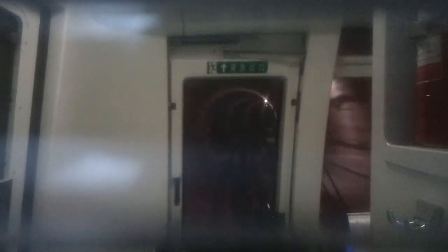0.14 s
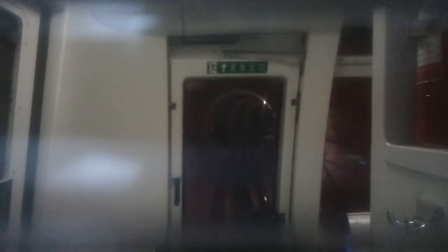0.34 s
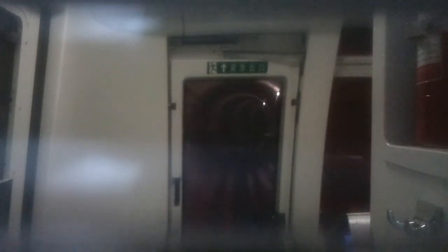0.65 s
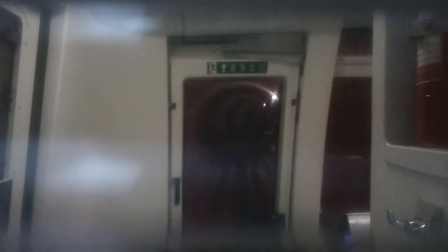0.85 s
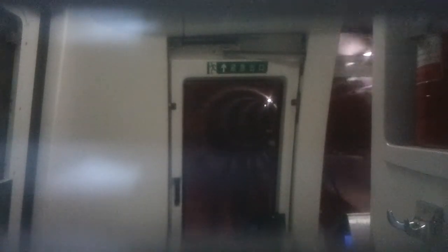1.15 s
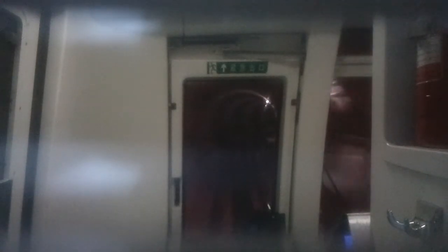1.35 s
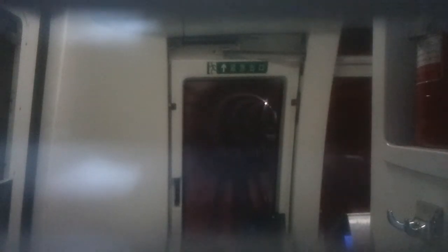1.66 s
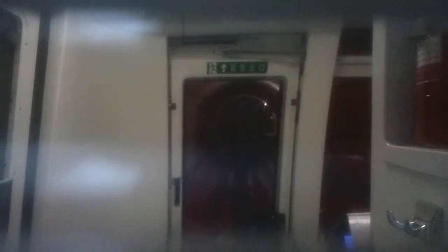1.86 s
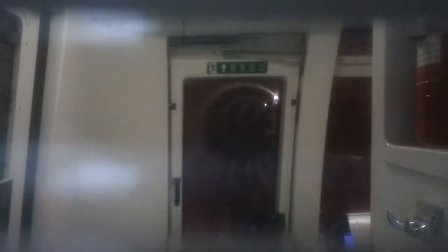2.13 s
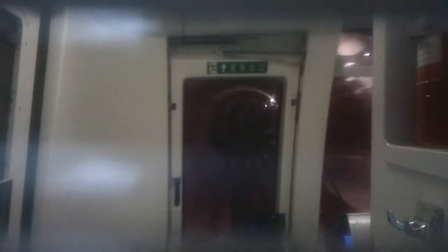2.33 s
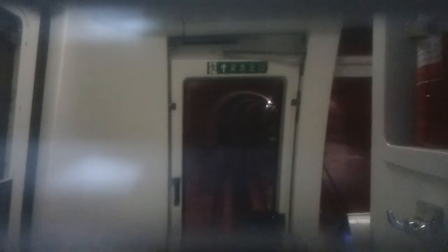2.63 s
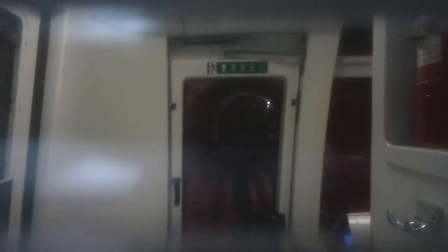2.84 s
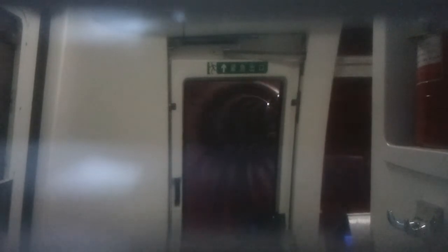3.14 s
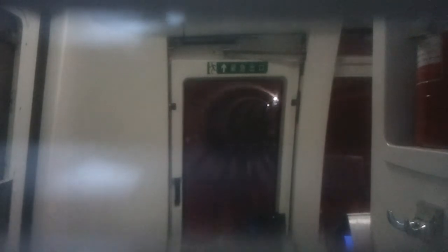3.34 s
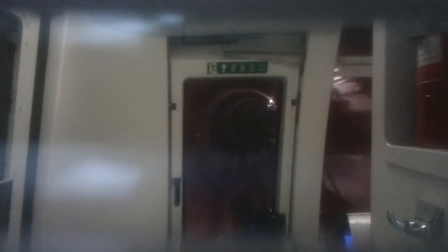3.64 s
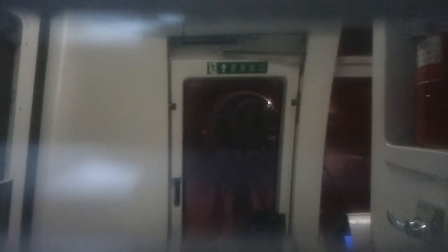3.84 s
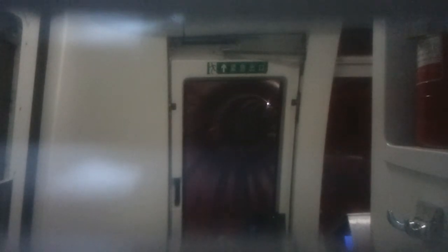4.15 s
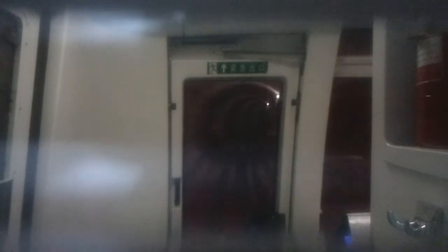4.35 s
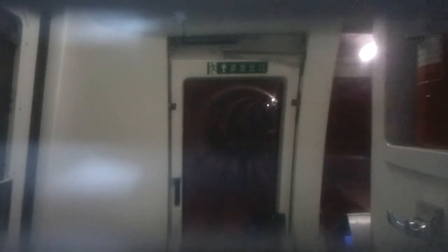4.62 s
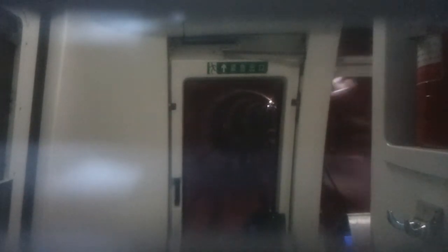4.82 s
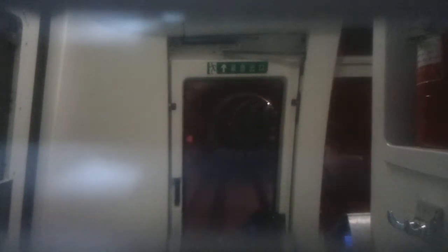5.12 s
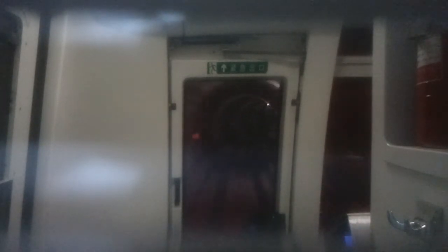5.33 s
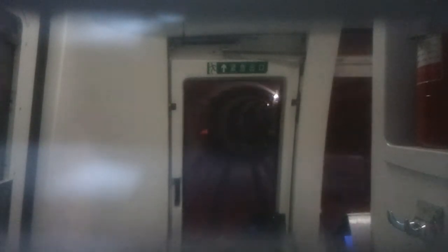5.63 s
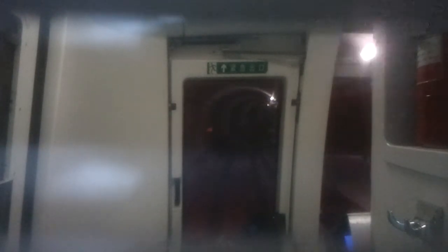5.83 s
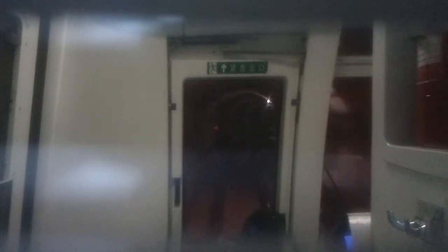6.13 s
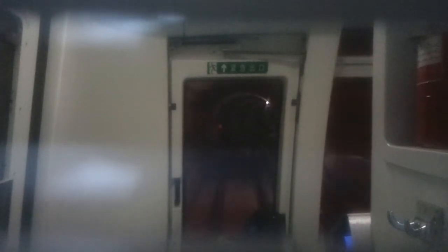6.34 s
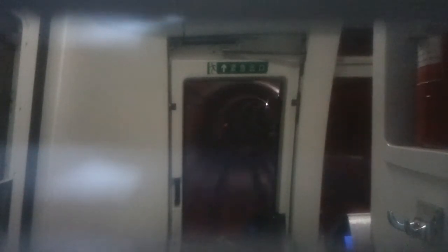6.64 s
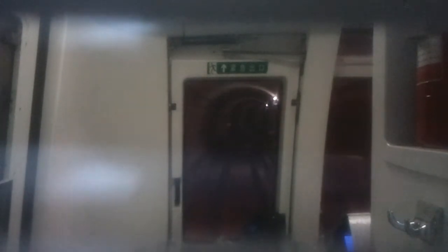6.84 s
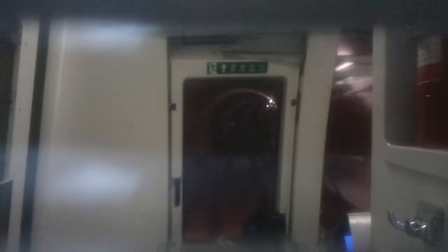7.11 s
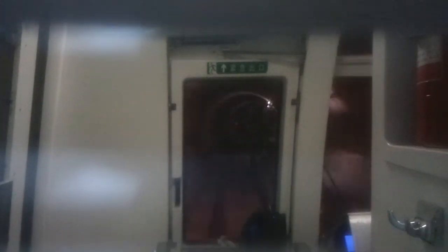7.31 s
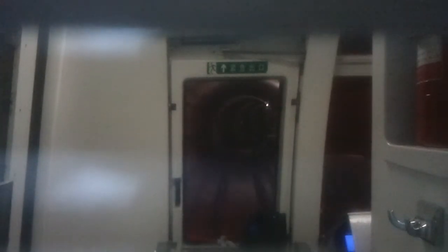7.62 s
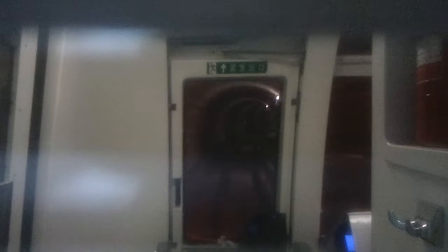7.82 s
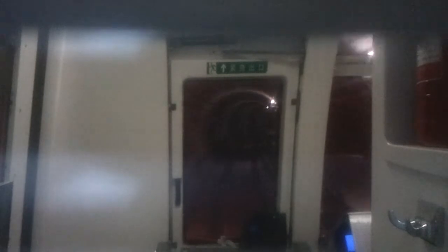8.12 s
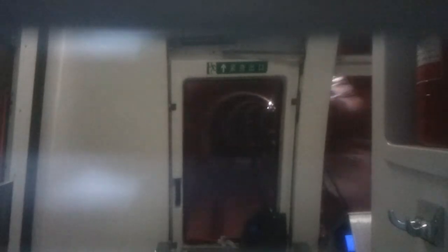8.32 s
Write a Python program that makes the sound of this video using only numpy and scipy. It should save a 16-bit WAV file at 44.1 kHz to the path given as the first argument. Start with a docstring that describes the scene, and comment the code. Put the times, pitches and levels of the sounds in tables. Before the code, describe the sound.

Loud, distorted low rumble of an underground train heard from within, throbbing unevenly over a dull rolling roar, peppered with sharp digital-sounding crackles.

```python
"""Inside a subway car running through a tunnel: the car's air booms near 65 Hz as a wavering sine,
its body and floor drone as shaped noise and panel modes, and the wheels roar, howl and hiss on the
rails as fluttering bands of noise. A small recorder is overloaded by the boom: it ducks the roar in
surges, squashes it on every bass crest and crackles in bursts at the seams of its 8 ms blocks."""
import sys
import numpy as np
from scipy import signal
from scipy.fft import rfft, irfft, next_fast_len
from scipy.io import wavfile
from scipy.ndimage import uniform_filter1d, minimum_filter1d, map_coordinates

SR = 44100
rng = np.random.default_rng(int(sys.argv[2]) if len(sys.argv) > 2 else 0)


def generate_wav(sig):
    """Save sig (samples, or channels by samples) to the path in sys.argv[1] as 16-bit PCM at SR."""
    pcm = np.round(np.clip(np.atleast_2d(sig).T, -1, 1) * 32767).astype(np.int16)
    wavfile.write(sys.argv[1], SR, pcm)


N = 373527  # length in samples


def amp(db):
    """Decibel law: every 20 dB is a factor of ten in amplitude."""
    return 10 ** (np.asarray(db) / 20)


def unit(x):
    """Normalisation: the signal scaled to rms 1."""
    return x / np.sqrt(np.mean(x ** 2) + 1e-20)


def curves(rows):
    """Linear interpolation: one value per sample for each column after the time."""
    seconds, *columns = np.transpose(rows)
    t = np.arange(N) / SR
    return [np.interp(t, seconds, column) for column in columns]


def wobble(rate):
    """Band-limited randomness: a smooth curve through `rate` random knots a second."""
    knots = rng.standard_normal(int(N * rate / SR) + 4)
    return map_coordinates(knots, [np.arange(N) * rate / SR])


def swells(rows):
    """Superposition of flat-topped bumps in dB, each at half its height one half length from its centre."""
    t = np.arange(N) / SR
    return sum(db / (1 + ((t - centre) / half) ** 4) for centre, half, db in rows)


def spells(rows):
    """Gating: a sudden step in dB that lasts from start to end of each row."""
    t = np.arange(N) / SR
    return sum(db * ((t >= start) & (t < end)) for start, end, db in rows)


def filtered(x, response):
    """Linear filtering: the spectrum of x times a response of frequency."""
    size = next_fast_len(N + SR // 2)
    hz = np.fft.rfftfreq(size, 1 / SR)
    return irfft(rfft(x, size) * response(hz), size)[:N]


def coloured(x, spectrum):
    """Spectral shaping: x through (Hz, dB) points on a log frequency axis, at rms 1."""
    points_hz, points_db = np.transpose(spectrum)

    def response(hz):
        return amp(np.interp(np.log(hz + 1), np.log(points_hz + 1), points_db))
    return unit(filtered(x, response))


def narrow_noise(centre_hz, width_hz):
    """Quadrature modulation: two random curves make a narrow band, rms 1, around a steady or moving centre."""
    phase = 2 * np.pi * np.cumsum(centre_hz * np.ones(N)) / SR
    return unit(wobble(width_hz) * np.cos(phase) + wobble(width_hz) * np.sin(phase))


def patchy_noise(patchy_db):
    """Non-stationary noise: narrow bands of white noise swell and fade on their own."""
    bands = signal.stft(rng.standard_normal(N), nperseg=2048)[2]
    field = uniform_filter1d(rng.standard_normal(bands.shape), size=5, axis=0)  # across frequency
    field = uniform_filter1d(field, size=6, axis=1)  # across time
    return signal.istft(bands * amp(patchy_db * unit(field)), nperseg=2048)[1][:N]


# The slow course of the ride. Each row: time in seconds, then relative levels in dB of the boom,
# the body shake, the wheel howl, the roar and the rail hiss.
RIDE_COURSE = [(0, -10, -28.5, -29.5, -35.5, -45.5), (.5, -12.5, -31, -27.5, -35.5, -45),
               (1.1, -11, -26, -29.5, -35.5, -46.5), (1.45, -4, -31, -28, -34, -43.5),
               (2, -12.5, -22.5, -29.5, -36, -44), (2.25, -6, -26, -29, -34.5, -44.5),
               (2.7, -6.5, -24, -27.5, -35, -45), (3.4, -7, -24, -28, -35, -45),
               (3.75, -8.5, -25, -28, -36, -43), (4.2, -5, -23, -29, -34.5, -44.5),
               (4.6, -4.5, -23.5, -27.5, -37, -44), (5.1, -4.5, -22, -27, -35, -46.5),
               (6, -6.5, -21.5, -28.5, -36, -45), (6.7, -4.5, -21, -28, -35.5, -45),
               (7.4, -5.5, -21.5, -29, -35, -45), (8.1, -6.5, -22.5, -27.5, -35.5, -45),
               (8.47, -6.5, -21.5, -27.5, -35.5, -48)]
# On smooth track the boom builds up into a strong, pure ring.
# Each row: centre in seconds, half length in seconds, rise in dB.
BOOM_SURGES = [(1.36, 0.058, 0.5), (2.14, 0.04, 5.5), (2.54, 0.032, 1.5), (3.24, 0.037, 0),
               (3.38, 0.035, 2.5), (4.02, 0.036, 1), (4.12, 0.021, 0.5), (4.45, 0.029, 1), (4.84, 0.036, 3),
               (5.005, 0.06, 1), (5.21, 0.037, 2.5), (5.48, .03, 0), (6.26, 0.027, 5), (6.63, 0.051, 2.5),
               (6.83, 0.015, 3.5), (7.27, 0.074, 3), (7.68, 0.042, 2), (8.05, 0.052, 2.5)]
# The boom weakens for a moment. Each row: centre in seconds, half length in seconds, drop in dB.
BOOM_LULLS = [(.15, 0.06, 18.5), (.63, 0.023, 9.5), (.87, .03, 6), (1.1, .025, 7.5), (1.26, 0.02, 12),
              (1.43, 0.021, 9.5), (1.62, .03, 6), (1.78, .03, 2), (2.05, 0.027, 4), (2.23, 0.018, 16),
              (3.03, 0.037, 6.5), (3.305, 0.013, 12), (3.455, 0.018, 8), (3.66, 0.018, 3.5),
              (4.17, 0.038, 3.5), (4.41, 0.016, 8), (4.55, 0.049, 6.5), (4.72, 0.05, 10), (4.92, 0.03, 4.5),
              (5.12, 0.023, 1.5), (5.33, 0.015, 13), (5.42, 0.018, 9), (5.79, 0.038, 17.5),
              (5.98, 0.061, 5), (6.16, 0.022, 6), (6.48, 0.053, 11), (7.02, 0.032, 2.5), (7.15, 0.027, 8),
              (7.42, 0.021, 5), (7.61, 0.023, 14), (7.97, 0.049, 7.5), (8.23, 0.047, 9)]
# Course of the ringing air's pitch. Each row: time in seconds, pitch in Hz.
AIR_PITCH = [(0, 72.1), (.17, 62.27), (.5, 72.15), (.72, 64), (.85, 75.1), (1.2, 66.77), (1.48, 66),
             (1.57, 72.87), (1.85, 62), (2, 66), (2.25, 65.5), (2.34, 75), (2.45, 66), (2.75, 67),
             (2.92, 57), (3.13, 76), (3.25, 55), (3.5, 72.85), (3.63, 73), (3.8, 60.14), (3.92, 67.9),
             (4.2, 70.97), (4.47, 57.1), (4.57, 74.83), (4.8, 64.95), (5.08, 65.05), (5.2, 58.75),
             (5.33, 64.94), (5.58, 56.5), (5.8, 69.3), (6.25, 61.82), (6.49, 78.9), (6.6, 62.75), (6.9, 62),
             (7.15, 64.83), (7.3, 62.46), (7.7, 61), (7.87, 72.87), (8.08, 66.53), (8.25, 73.23),
             (8.47, 66)]
WANDER_HZ = 1.568  # scale of the quick random wander about that pitch


def boom(gain_db=-1.7, lumps_db=1.5, stagger=0.52, jolts_hz=42, sway_db=0.27, sway_hz=9, wander_rate_hz=11):
    """Cavity resonance: rough track shakes the car, and its air rings at the lowest resonance."""
    level_db = curves(RIDE_COURSE)[0] + swells(BOOM_SURGES) - swells(BOOM_LULLS)
    strength_db = np.maximum(level_db - level_db.mean(), -6)
    # jolts upset the size and timing of the ring, a weak one more than a strong one
    upset = amp(0.72 * jolting() - 0.66 * strength_db)
    pitch_hz = curves(AIR_PITCH)[0] + WANDER_HZ * wobble(wander_rate_hz)
    steady_phase = 2 * np.pi * np.cumsum(pitch_hz) / SR
    phase = steady_phase + stagger * upset * wobble(jolts_hz)
    uneven_db = upset * (lumps_db * wobble(jolts_hz) + sway_db * wobble(sway_hz))
    ring = unit(amp(uneven_db) * np.sin(phase))
    return amp(level_db + gain_db) * ring


# Rough stretches of track. Each row: centre in seconds, half length in seconds, rise in dB.
ROUGH_TRACK = [(2.33, 0.018, 9), (2.72, 0.04, 1.5), (3.13, 0.048, 8), (3.57, 0.14, 3.5), (3.88, 0.086, 4),
               (4.33, 0.022, 3), (4.57, 0.06, 3), (4.73, 0.086, 10), (5.91, 0.035, 3.5), (6.06, 0.041, 3.5),
               (6.43, 0.12, 1), (7.17, 0.029, 10), (7.44, 0.059, 5.5), (7.87, 0.11, 3.5)]
SMOOTHING = 2.5  # dB less jolting for each dB of a boom surge


def jolting():
    """Forced vibration: how hard the track jolts the car, in dB about its usual state."""
    return swells(ROUGH_TRACK) - SMOOTHING * swells(BOOM_SURGES)


# The car body rumbling on its springs. Each row: frequency in Hz, relative level in dB.
BODY_SPECTRUM = [(5, -8), (20, -7.5), (38, -3), (52, 5), (65, -1), (78, 4.5), (91, 5), (105, -8.5),
                 (125, -15.5), (200, -56), (400, -120)]
# Floor panels over the bogie. Each row: frequency in Hz, relative level in dB.
FLOOR_SPECTRUM = [(60, -45.5), (120, -7), (155, 0.5), (182, -5), (208, -7), (240, -12), (300, -34),
                  (600, -85.5)]


def structure(rumble_db=9.5, drone_db=-32, drone_follows=0.78, lull_share=0.14, jolt_share=.55):
    """Structure-borne sound: the bogies shake the body and, less in step with the track, the floor panels."""
    shake_db = curves(RIDE_COURSE)[1] + jolt_share * jolting()
    body_db = shake_db + rumble_db - lull_share * swells(BOOM_LULLS)
    panels_db = drone_db + drone_follows * (shake_db - shake_db.mean())
    rumble = amp(body_db) * coloured(rng.standard_normal(N), BODY_SPECTRUM)
    drone = amp(panels_db) * coloured(rng.standard_normal(N), FLOOR_SPECTRUM)
    return rumble + drone


# The floor's ringing mode. Each row: time in seconds, relative level in dB.
FLOOR_MODE = [(0, -43.5), (1.3, -38.5), (1.95, -35.5), (2.15, -34), (2.5, -36), (2.9, -35), (3.13, -32.5),
              (3.4, -33), (3.8, -35.5), (4.25, -34), (5.2, -38.5), (6.3, -34), (6.9, -33), (7.4, -36),
              (8, -34), (8.47, -34)]
# A higher panel mode. Each row: time in seconds, relative level in dB.
WALL_MODE = [(0, -39), (.45, -40), (.68, -29), (.9, -42), (1.6, -38), (2.5, -39.5), (3.6, -36),
             (4.4, -42.5), (5.3, -41), (6.5, -39.5), (7.5, -36), (8, -34.5), (8.47, -37.5)]


def panel_modes(floor_hz=208, floor_width_hz=22, floor_db=1.0, wall_hz=343, wall_width_hz=22, wall_db=0.5):
    """Modal resonance: two panel modes swell and fade, each in its own time."""
    floor = amp(curves(FLOOR_MODE)[0] + floor_db) * narrow_noise(floor_hz, floor_width_hz)
    wall = amp(curves(WALL_MODE)[0] + wall_db) * narrow_noise(wall_hz, wall_width_hz)
    return floor + wall


# Wheels howling on the rails. Each row: frequency in Hz, relative level in dB.
HOWL_SPECTRUM = [(100, -41), (240, -8), (305, -0.5), (342, -4.5), (385, -2.5), (420, -2.5), (475, -0.3),
                 (535, -2), (600, -2), (645, -1), (715, -2.5), (810, -8), (950, -17), (1500, -66)]
# Wheels and panels ringing faintly in the howl.
# Each row: centre in Hz, width in Hz, level in dB against the howl's noise.
HOWL_RINGS = [(468.6, 22, -19), (602.4, 24, -16.5), (687, 28, -14)]
# The tunnel's roar through the windows. Each row: frequency in Hz, relative level in dB.
ROAR_SPECTRUM = [(500, -28), (900, 0), (1150, -2.5), (1520, -2), (1650, -5.5), (1780, -12.5), (4000, -40.5)]
# Rail hiss that leaks in round the doors. Each row: frequency in Hz, relative level in dB.
RAIL_SPECTRUM = [(1000, -36.5), (2000, -2.5), (2600, -2), (3120, 1.5), (3900, -8), (5000, -11.5),
                 (6100, -15), (7100, -8.5), (7800, -14.5), (9000, -15)]


def rolling(howl_db=1.5, roar_db=0.1, hiss_db=0.24, flutter_db=-1.25, drift_db=0.04, chatter_db=-0.5):
    """Rolling contact: wheel on rail howls, roars and hisses, all fluttering a little with the contact."""
    wheel_db, tunnel_db, rail_db = curves(RIDE_COURSE)[2:]
    contact_db = flutter_db * wobble(64) + drift_db * wobble(2.3)
    rings = sum(amp(db) * narrow_noise(hz, width_hz) for hz, width_hz, db in HOWL_RINGS)
    howl_noise = coloured(patchy_noise(patchy_db=-0.1), HOWL_SPECTRUM)
    howl = amp(wheel_db + howl_db) * (howl_noise + rings) + singing()
    roar = amp(tunnel_db + roar_db) * coloured(rng.standard_normal(N), ROAR_SPECTRUM)
    hiss = amp(rail_db + hiss_db) * coloured(patchy_noise(patchy_db=2.0), RAIL_SPECTRUM) + sheen()
    # rough patches of rail make the howl chatter, and the roar half as much in dB
    rough_db = chatter_db * unit(wobble(30) + wobble(160))
    chattering = unit(amp(rough_db)) * howl + unit(amp(rough_db / 2)) * roar
    return amp(contact_db) * (chattering + hiss)


# The rippled rail makes the wheels sing. Each row: time in seconds, pitch in Hz, relative level in dB.
WHEEL_SONG = [(0, 676, -35), (.35, 702.8, -31.5), (.8, 704.1, -33), (1.05, 725, -33.5), (1.3, 743.8, -30.5),
              (1.8, 702.8, -33), (2.3, 686, -38.5), (3.3, 697, -44.5), (4.6, 684.2, -34.5),
              (5.1, 687.6, -41), (5.8, 693.1, -43), (7, 682, -39.5), (8.47, 661, -43)]


def singing(width_hz=75, gain_db=0.0, lower_ratio=.865, lower_width_hz=70, lower_db=-3):
    """Periodic excitation: two narrow, hollow bands of noise follow the spacing of the rail's ripples."""
    pitch_hz, level_db = curves(WHEEL_SONG)
    upper = narrow_noise(pitch_hz, width_hz)
    lower = amp(lower_db) * narrow_noise(lower_ratio * pitch_hz, lower_width_hz)
    return amp(level_db + gain_db) * (upper + lower)


# A thin, airy band of the rail hiss, strongest in the first two seconds.
# Each row: time in seconds, relative level in dB.
SHEEN_LEVEL = [(0, -53), (2.05, -49), (2.2, -61.5), (8.47, -58)]


def sheen(centre_hz=3130, width_hz=540):
    """Band-limited noise: a narrow, unsteady band of hiss rides on the rail noise."""
    level_db = curves(SHEEN_LEVEL)[0] + 1.5 * wobble(18)
    return amp(level_db) * narrow_noise(centre_hz, width_hz)


# Brief flange squeaks. Each row: centre in seconds, half length in seconds (to 1/e), relative level in dB.
FLANGE_SQUEAKS = [(.175, .016, -49), (.38, 0.025, -43)]


def squeaks(pitch_hz=3230, waver_hz=25):
    """Frictional excitation: a wheel flange brushes the rail and rings for an instant."""
    t = np.arange(N) / SR
    envelope = sum(amp(db) * np.exp(-((t - centre) / half) ** 2) for centre, half, db in FLANGE_SQUEAKS)
    phase = 2 * np.pi * np.cumsum(pitch_hz + waver_hz * wobble(90)) / SR
    return envelope * unit(np.sin(phase))


def scene():
    """Superposition: the sum of everything that fills the car."""
    return (boom() + structure() + panel_modes() + rolling() + squeaks())[None]


def limiter(x, ceiling=0.87, size=550):
    """Gain reduction: peaks, as in strong bass, turn everything down over `size` samples."""
    needed = ceiling / np.maximum(np.abs(x), ceiling)
    return x * uniform_filter1d(minimum_filter1d(needed, size), size)


def overload(x, top=0.71, hardness=6, shut=0.68, split_hz=135):
    """Saturation and intermodulation: each bass crest is rounded off and squeezes the roar riding on it."""
    bass = filtered(x, lambda hz: 1 / (1 + (hz / split_hz) ** 10))
    rounded = bass / (1 + np.abs(bass / top) ** hardness) ** (1 / hardness)
    openness = np.maximum(1 - np.square(rounded / shut), 0)
    return rounded + (x - bass) * openness


# The recorder's own hiss. Each row: frequency in Hz, relative level in dB.
RECORDER_HISS = [(1000, -2), (4000, 0.5), (5500, -3.5), (7500, -4.5), (9000, -18.5)]


def self_noise(level_db=-64.5, pitch_hz=8000, hiss_db=-55):
    """Electronic noise: the recorder's steady hiss, and a faint, unsteady whistle at the top of its band."""
    whistle = unit(wobble(45) * np.sin(2 * np.pi * pitch_hz * np.arange(N) / SR))
    hiss = coloured(rng.standard_normal(N), RECORDER_HISS)
    return amp(level_db) * whistle + amp(hiss_db) * hiss


BLOCK_HZ, FIRST_SEAM = 125, .0053  # blocks a second; time of the first seam in seconds
# Scale of the random jumps before they are softly limited. Each row: time in seconds, size in dB.
CRACKLE_SIZE = [(0, -29), (.4, -22.5), (1.2, -22.5), (2.5, -17), (3.5, -20.5), (4.4, -18), (5.5, -17.5),
                (6.5, -19.5), (7.6, -18), (8.47, -14)]
# Bursts of crackle. Each row: start in seconds, end in seconds, change in dB (mostly a rise).
CRACKLE_BURSTS = [(.8, .85, 7), (.99, 1.24, 4.5), (1.71, 1.75, 7), (1.95, 2.06, 7), (2.12, 2.18, 14),
                  (2.28, 2.36, 8), (2.89, 3.04, 2.5), (3.07, 3.23, 6), (3.3, 3.4, 1), (3.47, 3.57, 12),
                  (3.6, 3.68, 7), (3.72, 3.78, 8), (3.81, 3.95, 6), (4.07, 4.15, 6), (4.31, 4.35, 5),
                  (4.5, 4.79, 5), (5.07, 5.16, 7.5), (5.31, 5.36, 8), (5.63, 5.68, 10), (5.89, 5.95, 6),
                  (6.01, 6.06, 8), (6.31, 6.39, 5), (6.42, 6.47, 0), (6.5, 6.56, 1), (6.72, 6.82, 6),
                  (6.87, 6.92, 15), (7.01, 7.06, 9), (7.15, 7.2, 13), (7.38, 7.46, 5), (7.78, 7.87, 2),
                  (7.94, 8.01, -1), (8.39, 8.45, 7)]
# Quieter crackle. Each row: start in seconds, end in seconds, drop in dB.
CRACKLE_PAUSES = [(.6, .79, 2.5), (.85, .89, 7), (2.52, 2.58, 6), (3.23, 3.26, 5), (3.43, 3.47, 5),
                  (4.79, 4.91, 4), (4.95, 5.07, 10), (5.27, 5.31, 6), (5.36, 5.39, 6), (5.47, 5.5, 8),
                  (5.6, 5.63, 8), (5.68, 5.72, 10), (6.23, 6.31, 6), (6.47, 6.5, 9), (6.59, 6.68, 2),
                  (6.83, 6.87, 10), (7.2, 7.38, 3), (8.01, 8.07, 3)]
# Single jumps set to a given size, up or down. Each row: time in seconds, size in dB.
SEAM_TICKS = [(0.509, -15), (0.805, -13.0), (1.541, -13.0), (1.581, -16), (1.741, -13), (2.021, -15),
              (2.037, -15), (2.317, -10.0), (2.333, -11.5), (2.341, -11), (2.357, -12.5), (2.629, -12.5),
              (2.749, -15), (2.757, -13.0), (2.773, -13.0), (2.893, -15.0), (2.965, -13), (2.981, -13),
              (2.989, -13.0), (3.069, -13.0), (3.085, -18), (3.093, -11), (3.117, -11), (3.133, -10),
              (3.157, -10), (3.165, -11.5), (3.181, -15), (3.197, -14), (3.341, -11.5), (3.477, -12),
              (3.493, -12), (3.501, -8), (3.525, -14.0), (3.541, -12), (3.549, -14), (3.565, -16),
              (3.605, -11), (3.613, -13), (3.637, -12.5), (3.653, -12), (3.765, -15), (3.813, -13.5),
              (3.853, -14.0), (3.869, -13), (3.893, -16), (3.909, -11), (3.925, -7.5), (3.941, -12.0),
              (4.141, -16), (4.221, -13), (4.229, -17), (4.261, -13.5), (4.333, -13.0), (4.525, -17),
              (4.533, -11.0), (4.557, -16), (4.589, -14), (4.597, -12), (4.605, -15), (4.645, -18),
              (4.661, -10), (4.685, -17), (4.709, -12), (4.733, -11.0), (4.781, -9.5), (5.253, -12.5),
              (5.317, -16), (5.341, -18), (5.357, -16), (5.677, -15), (5.733, -10.0), (5.749, -14),
              (5.909, -11.5), (5.917, -14), (5.925, -10.5), (5.933, -14), (6.045, -11.0), (6.085, -15),
              (6.093, -12.5), (6.325, -13.0), (6.341, -14.5), (6.381, -15), (6.421, -13), (6.437, -11),
              (6.453, -13), (6.517, -14.0), (6.525, -14.0), (6.541, -12.5), (6.557, -13.0), (6.725, -10.0),
              (6.885, -9), (7.149, -11.5), (7.189, -10.5), (7.197, -16), (7.389, -10), (7.453, -13),
              (7.789, -11.5), (7.829, -15), (7.853, -15), (7.861, -15), (7.893, -13.0), (7.901, -13.0),
              (7.957, -14), (7.989, -14.5), (8.101, -12), (8.181, -14), (8.213, -13), (8.237, -13),
              (8.269, -15), (8.309, -14.0), (8.397, -9.5), (8.421, -17), (8.429, -13.5), (8.445, -13.5)]


def seams(x, largest_db=-15.0, crest=0.91, relax_hz=240, edge_hz=18000):
    """Discontinuity: the waveform jumps between blocks, in sudden bursts; random jumps shrink on crests."""
    at = np.round(np.arange(FIRST_SEAM, N / SR, 1 / BLOCK_HZ) * SR).astype(int)
    size_db = curves(CRACKLE_SIZE)[0] + spells(CRACKLE_BURSTS) - spells(CRACKLE_PAUSES)
    headroom = np.maximum(1 - np.square(x[at] / crest), .25)
    drive = amp(size_db[at] - largest_db) * headroom * rng.standard_normal(len(at))
    steps = amp(largest_db) * np.tanh(drive)
    for seconds, db in SEAM_TICKS:
        steps[round((seconds - FIRST_SEAM) * BLOCK_HZ)] = amp(db) * rng.choice([-1, 1])
    jumps = np.bincount(at, steps, N)

    # each jump has a sharp edge and relaxes to both sides within a millisecond or two
    def response(hz):
        relaxing = SR / (2 * np.pi) * -1j * hz / (hz ** 2 + relax_hz ** 2)
        return relaxing * (1 + (hz / edge_hz) ** 2)
    return filtered(jumps, response)


CEILING, TOP_HZ = .708, 8100  # clipping amplitude; upper band limit in Hz


def record(dry):
    """Signal chain: limiter, overload, own noise, block seams, a flat ceiling, then the band limit."""
    squashed = overload(limiter(dry[0])) + self_noise()
    clipped = np.clip(squashed + seams(squashed), -CEILING, CEILING)
    return filtered(clipped, lambda hz: 1 / np.sqrt(1 + (hz / TOP_HZ) ** 80))[None]


dry = scene()
out = record(dry)
generate_wav(out)
```